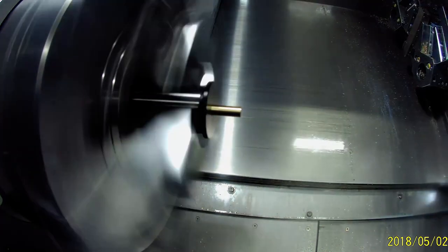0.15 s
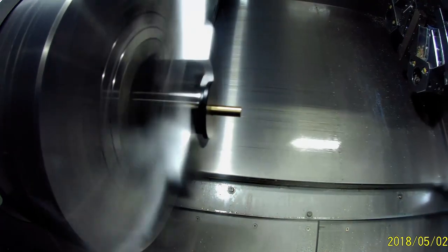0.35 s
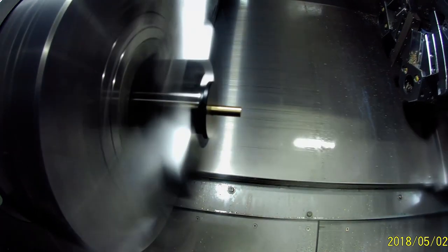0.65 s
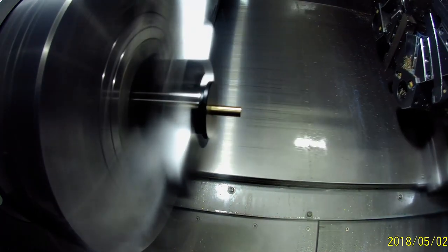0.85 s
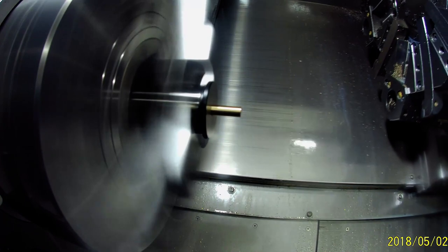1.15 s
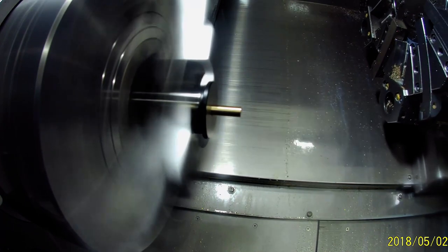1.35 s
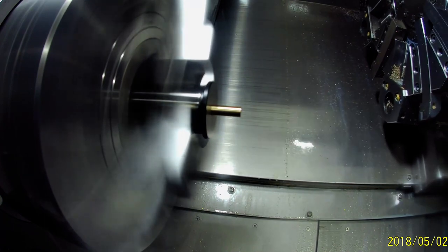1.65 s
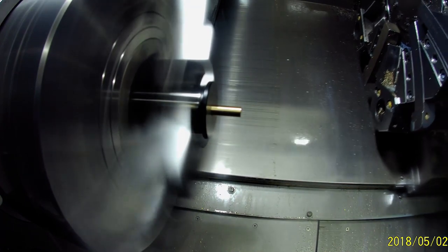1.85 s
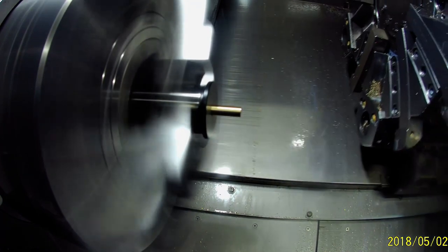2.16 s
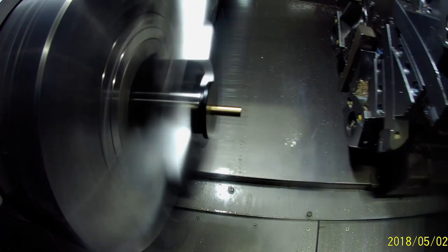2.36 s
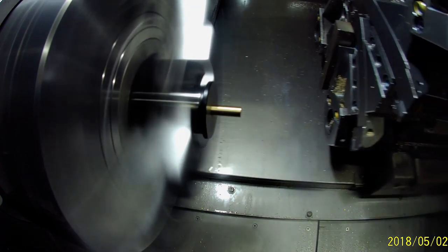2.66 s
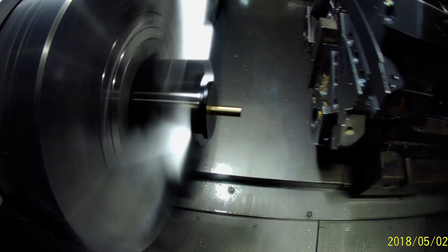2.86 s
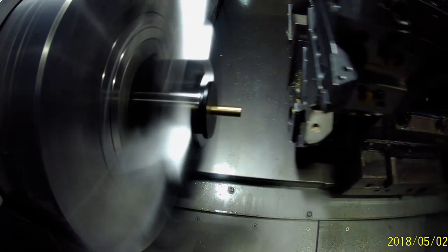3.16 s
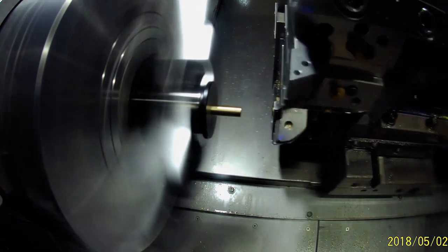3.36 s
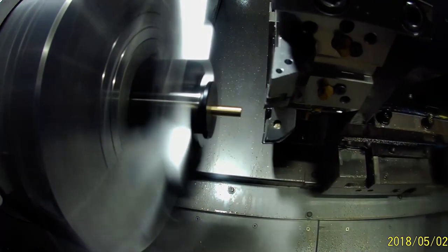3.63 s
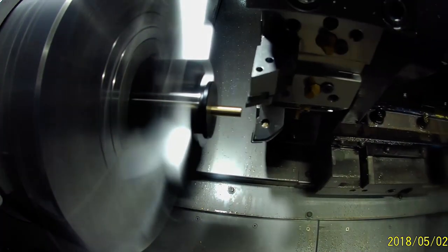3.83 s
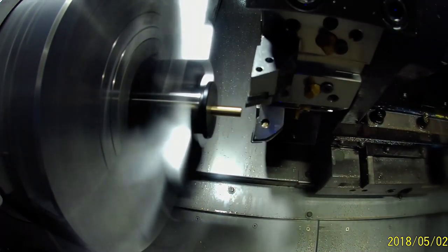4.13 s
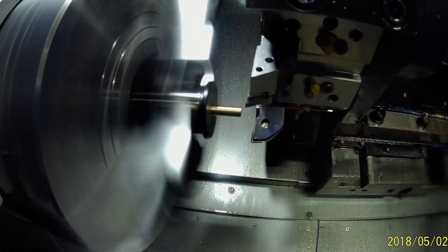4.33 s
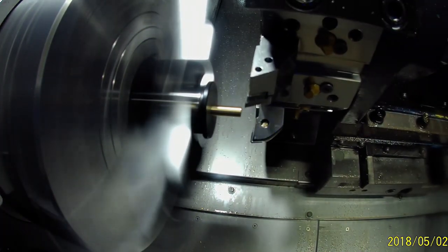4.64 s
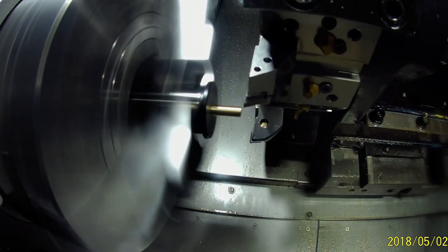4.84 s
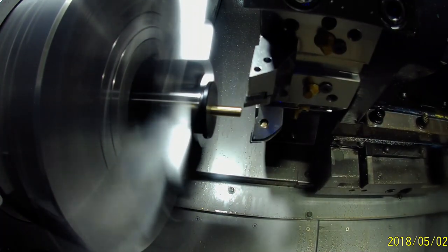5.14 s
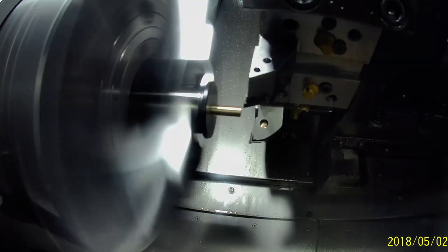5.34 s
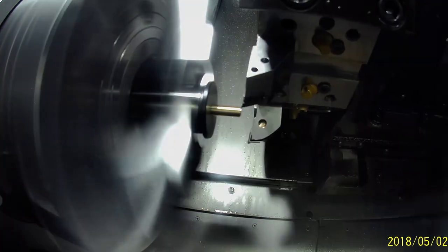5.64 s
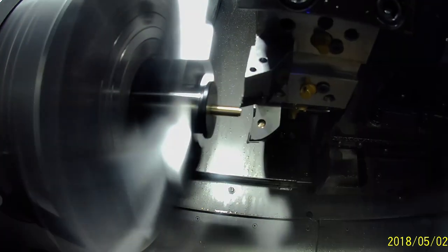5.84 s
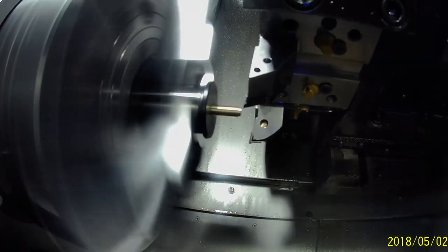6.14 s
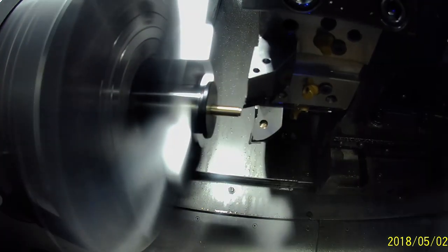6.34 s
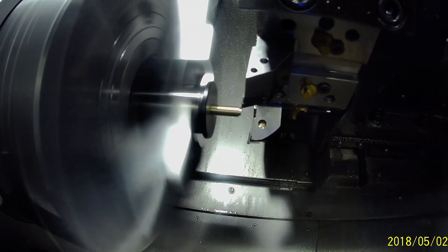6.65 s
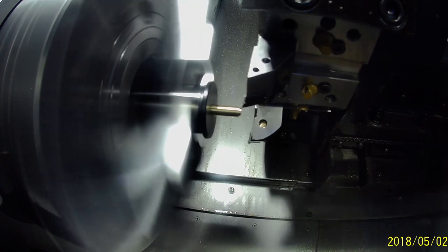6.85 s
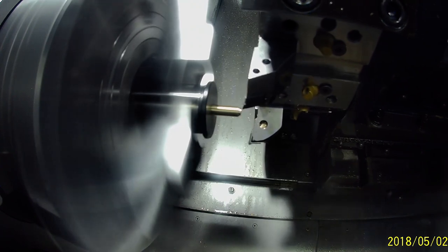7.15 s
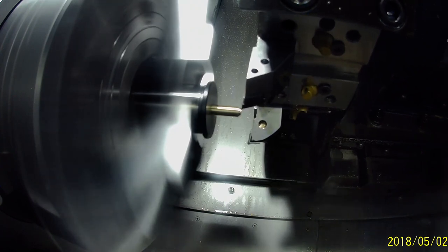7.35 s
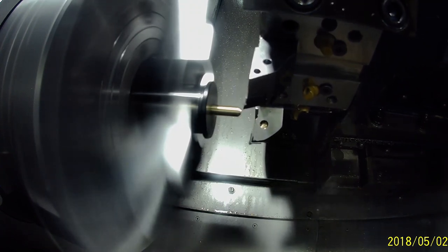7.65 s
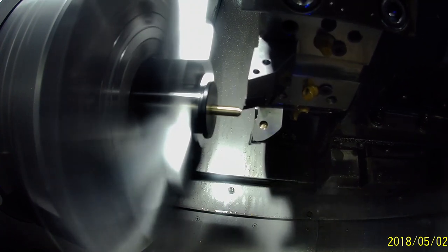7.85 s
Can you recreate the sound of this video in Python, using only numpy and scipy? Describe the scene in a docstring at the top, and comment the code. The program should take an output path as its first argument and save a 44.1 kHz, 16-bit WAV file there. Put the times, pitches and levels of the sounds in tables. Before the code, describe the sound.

A near microphone in a reverberant metal machine catches a quick rising motor whine, settling into a steady low hum with lumpy buffeting and airy hiss. The hum drops away as the tool carrier settles; sheet metal clatters, a gritty surge grows and stops suddenly. Light rattles and small knocks continue, crossed by three short, piercing air jets with brief echoes.

```python
"""CNC lathe run-up and air blasts

A CNC lathe spins up: the motor drive whistles and three chuck jaws beat the air into a 100 Hz hum with a windy rush.
As the tool turret arrives the jaw hum gives way to a faint 100 Hz hum, probably from the mains.
A rough rush swells and stops dead, and the guards rattle and knock.
Three blasts of compressed air, made of shaped noise and gliding tones, hiss and ring out in the workshop."""
import sys
import numpy as np
from scipy import signal
from scipy.fft import rfft, irfft, next_fast_len
from scipy.io import wavfile

SR = 44100
rng = np.random.default_rng(int(sys.argv[2]) if len(sys.argv) > 2 else 0)


def int16_out(signal):
    """Quantize to a 16-bit WAV file."""
    q = np.round(np.clip(np.atleast_2d(signal).T, -1, 1) * 32767)
    wavfile.write(sys.argv[1], SR, q.astype(np.int16))


N = 352403
TIME = np.arange(N) / SR
TOP_HZ = 100.05   # jaw passes per s at full speed
START_S = 0.24   # spindle starts to turn


def from_db(db):
    """Decibels to gain."""
    return 10 ** (np.asarray(db) / 20)


def rms_one(x):
    """Scale to unit power."""
    return x / np.sqrt(np.mean(x ** 2) + 1e-20)


def curve(rows):
    """Gain along rows of (time_s, level_db), held beyond the ends."""
    return from_db(np.interp(TIME, *np.transpose(rows)))


def gains(rows):
    """One gain curve per dB column, fading exponentially outside the rows' times."""
    time_s, *columns_db = np.transpose(rows)
    outside_s = np.maximum(np.maximum(time_s[0] - TIME, TIME - time_s[-1]), 0)
    fade = np.exp(-outside_s / 0.071)
    return [from_db(np.interp(TIME, time_s, level_db)) * fade for level_db in columns_db]


def swell(start_s, stop_s, attack_s, release_s):
    """Envelope that rises smoothly until start, holds at 1 and decays after stop."""
    before = np.maximum(start_s - TIME, 0) / attack_s
    after = np.maximum(TIME - stop_s, 0) / release_s
    return np.exp(-np.minimum(before ** 2 + after, 20))


def drift(rate_hz):
    """Slow random wander with a spread of 1, low-passed noise computed at SR / 40."""
    r = np.exp(-80 * np.pi * rate_hz / SR)
    white = rng.standard_normal(N // 40 + 2002)
    slow = signal.lfilter([1], [1, -2 * r, r * r], white)[2000:]   # drop the settling
    return np.interp(np.arange(N) / 40, np.arange(len(slow)), rms_one(slow))


def coloured(x, spectrum):
    """Shape a sound by (freq_hz, density_db), falling 36 dB/octave beyond the ends; rms 1."""
    hz, density_db = np.transpose(spectrum)
    size = next_fast_len(N + 8192)
    octave = np.log2(np.maximum(np.arange(size // 2 + 1) * SR / size, 1))
    beyond = np.abs(octave - np.clip(octave, np.log2(hz[0]), np.log2(hz[-1])))
    shape = from_db(np.interp(octave, np.log2(hz), density_db) - 36 * beyond)
    return rms_one(irfft(rfft(x, size) * shape, size)[:N])


def noise(spectrum):
    """Turbulent noise of a given colour; rms 1."""
    return coloured(rng.standard_normal(N), spectrum)


def narrow_tone(hz, width_hz, steadiness=0.52):
    """A resonance fed by turbulence: a tone that wavers in level and phase; rms 1."""
    waver = drift(width_hz / 2) + 1j * drift(width_hz / 2)
    waver = waver / (np.abs(waver) + 0.1) ** steadiness
    phase = 2 * np.pi * np.cumsum(hz * np.ones(N)) / SR
    return rms_one(np.real(waver * np.exp(1j * phase)))


def glides(rows, width_hz, edge_s):
    """Narrow resonances that swell, slide from one pitch to another and fade."""
    out = np.zeros(N)
    for start, stop, from_hz, to_hz, level_db in rows:
        hz = np.interp(TIME, [start, stop], [from_hz, to_hz])
        out += from_db(level_db) * swell(start, stop, edge_s, edge_s) * narrow_tone(hz, width_hz)
    return out


def ring(clicks, hz, t60_s):
    """A two-pole resonance: each unit click starts a decaying sine of initial height 1."""
    r, w = from_db(-60 / (t60_s * SR)), 2 * np.pi * hz / SR
    return signal.lfilter([0, np.sin(w)], [1, -2 * r * np.cos(w), r * r], clicks + 1e-18)


def bump(hz, rise_s):
    """A resonance whose envelope swells to 1 in the rise time and dies away."""
    t = TIME[:SR // 4]
    return t / rise_s * np.exp(1 - t / rise_s) * np.sin(2 * np.pi * hz * t)


def contacts(per_s, spread_db):
    """Random small impacts of uneven strength and either sign."""
    sizes = from_db(spread_db * np.minimum(rng.exponential(1, N), 4))
    return sizes * rng.choice([-1, 1], N) * (rng.random(N) < per_s / SR)


def add(out, start_s, sound):
    """Mix a short sound in at a time."""
    at = int(start_s * SR)
    out[at:at + len(sound)] += sound[:N - at]


def jaw_rate():
    """Jaw passes per s: constant torque to base speed, then constant power (rate squared climbs) to the top."""
    base_s, base_hz, power_hz2_per_s = 0.58, 55, 13200
    torque_hz = base_hz * np.clip((TIME - START_S) / (base_s - START_S), 0, 1)
    power_hz2 = power_hz2_per_s * np.maximum(TIME - base_s, 0)
    return np.minimum(np.sqrt(torque_hz ** 2 + power_hz2), TOP_HZ)


def stirred():
    """Share of the air round the chuck that has been set moving."""
    return swell(0.58, TIME[-1], 0.12, 1)


def hum(speed, phase, flutter=0.097, upper_flutter=0.17):
    """Uneven harmonics: jaw hum until about 4.5 s, then a faint 100 Hz hum, probably from the mains."""
    # harmonics of the hum: order, relative_db
    hum_orders = [(1, 1), (2, -10.5), (3, -16.5), (4, -31.5), (5, -39)]
    # level of the jaw hum until about 4.5 s, then of the faint hum: time_s, relative_db
    hum_level = [(4.1, 0), (4.29, -8), (4.41, -8), (4.49, -20.5), (5.25, -20.5), (5.36, -29), (5.87, -29),
                 (5.95, -35.5), (6.13, -35.5), (6.19, -28), (6.72, -31.5), (7.02, -25), (7.2, -28),
                 (7.99, -27)]
    # brief booms with the heavier jolts: time_s, level_db
    booms = [(4.61, -33.5), (4.9, -30), (5.23, -34)]
    top_db, speed_power, waver_db, boom_s = -18, 2.6, 0.33, 0.035
    harmonics = np.zeros(N)
    for k, relative_db in hum_orders:
        uneven = 1 + upper_flutter * np.log(k) * drift(16)
        harmonics += from_db(relative_db) * uneven * np.cos(k * phase)
    level = from_db(top_db) * speed ** speed_power * stirred() * curve(hum_level)
    for s, level_db in booms:
        level = level + from_db(level_db) * swell(s, s, boom_s, boom_s)
    return level * from_db(waver_db * drift(4)) * (1 + flutter * drift(17)) * harmonics


def windage(speed, phase, chop=0.057, lumpy_db=1.8):
    """Eddies off the chuck grow with speed: lumpy buffeting, a rush and hiss chopped by the jaws, and thuds."""
    # airflow strength: time_s, relative_db
    airflow = [(.78, -2), (.97, 2.5), (1.17, 2), (1.6, .5), (3.3, -.2), (3.6, -2.4), (4.0, -2.5),
               (4.38, -7), (4.58, -21)]
    # stronger gusts of buffeting: time_s, level_db
    gust_rows = [(.58, -37.5), (1.18, -27), (1.42, -30), (3.57, -35), (3.69, -28), (3.98, -35.5),
                 (4.38, -39)]
    # low thuds of air: start_s, level_db, pitch_hz
    thuds = [(1.0, -29, 42), (1.176, -17.5, 192.2), (2.74, -27, 55), (3.47, -23, 85.4), (3.697, -23, 75.7),
             (3.97, -29, 50.6)]
    # spectra of the buffeting, rush and hiss: freq_hz, density_db (relative, per Hz)
    buffet_colour = [(15, -13.5), (30, -6), (55, 2), (85, 2.5), (130, -2.5), (200, -6), (300, -13),
                     (450, -36.5)]
    rush_colour = [(190, -36.5), (330, 0.5), (398, -1), (455, -9), (545, -4.5), (772, -9.5), (844, -4.5),
                   (907, -10), (1110, -9), (1330, -14.5), (1770, -6), (2080, -16.5), (2800, -20.5),
                   (3640, -54), (6160, -120)]
    hiss_colour = [(2000, -5), (2700, -3), (3400, 2.5), (4500, -0.5), (6000, -6.5), (6900, -10.5),
                   (7600, -19.5), (9000, -20), (10500, -42.5), (16000, -44)]
    gust_s, hiss_sag_db_per_s = 0.045, 1.5

    flow = curve(airflow) * swell(0, airflow[-1][0], 1, release_s=0.14)
    gusts = sum(from_db(level_db) * swell(s, s, gust_s, gust_s) for s, level_db in gust_rows)
    # the frame shudders under the starting torque
    gusts = gusts + from_db(-52) * swell(0.25, 0.52, 0.022, gust_s)
    buffet = flow * stirred() * from_db(-32.5 + lumpy_db * drift(9.7)) * speed ** 1.8
    rush = from_db(-36 + 1.1 * drift(11)) * speed ** 1.12 * noise(rush_colour)
    hiss_db = -47.5 - hiss_sag_db_per_s * (TIME - 1)
    hiss = from_db(hiss_db) * speed ** 1.18 * noise(hiss_colour)
    out = np.hypot(buffet, gusts) * noise(buffet_colour)
    out += flow * (1 + chop * np.cos(phase)) * (rush + hiss)
    for s, level_db, hz in thuds:
        add(out, s, from_db(level_db) * bump(hz, rise_s=0.94 / hz))
    return out


def motor(phase):
    """The drive's carrier with sidebands that fan out with speed, a thin sizzle and the starting groan."""
    # drive sidebands: offset in jaw rates, relative_db
    sideband_rows = [(-4.5, -10.5), (7.5, -11), (0, -13.5), (2.5, -11.5), (19, -23)]
    # whistle each time the drive pulls: start_s, stop_s, relative_db
    pulls = [(0.25, 0.296, -40.5), (.368, .505, -44.5), (0.615, 0.664, -42), (.71, 0.748, -42),
             (0.88, .93, -42), (1.103, 1.15, -52.5)]
    # thin sizzle, strongest in the run-up, fading out by 3.4 s: time_s, relative_db
    sizzle_rows = [(0.3, -94), (0.36, -72), (0.48, -62.5), (0.69, -58), (0.84, -72.5), (1.11, -64),
                   (3.36, -88), (3.4, -106)]
    # spectra of the sizzle and groan: freq_hz, density_db (relative, per Hz)
    sizzle_colour = [(6500, -8), (8500, -5), (10300, -8.5), (13000, -2), (14800, -2.5), (16000, -16.5)]
    groan_colour = [(700, -11), (1100, -0.5), (1300, 8.5), (1550, 6.5), (2000, -2.5), (2600, -10),
                    (3300, -23.5), (4500, -32)]
    carrier_hz, attack_s, release_s = 6001, 0.014, 0.026

    carrier = 2 * np.pi * carrier_hz * TIME
    sidebands = np.zeros(N)
    for k, relative_db in sideband_rows:
        level = from_db(relative_db + 1.8 * drift(25))
        sidebands += level * np.sin(carrier + k * phase + drift(25))
    whistle = from_db(0.8 + 1.8 * drift(22)) * np.sin(carrier) + from_db(0.5) * sidebands
    whistle += from_db(-9) * noise([(5300, -17.5), (6050, 9), (6500, -6), (7000, -30)])
    effort = sum(from_db(db) * swell(start, stop, attack_s, release_s) for start, stop, db in pulls)
    # weaker whistle from the start until after top speed is reached
    effort = effort + from_db(-57.5) * swell(START_S, 2.9, attack_s, release_s=0.65)
    sizzle = from_db(2.5) * gains(sizzle_rows)[0] * noise(sizzle_colour)
    # groan as the spindle breaks loose
    groan = from_db(-42) * swell(0.3, 0.3, 0.048, 0.096) * noise(groan_colour)
    return effort * whistle + sizzle + groan


def transmission(rate, phase):
    """A gear whine, roughened once a turn (every third jaw), sweeps through the housing's resonance."""
    # lower housing tone: start_s, stop_s, from_hz, to_hz, level_db
    housing_tone = [(.51, 0.605, 590, 590, -42.5)]
    order, whine_db, housing_hz, housing_q = 15.5, -33, 820, 9
    roughness = 1 + 0.46 * drift(45) + 0.35 * np.cos(phase / 3)
    whine = roughness * np.sin(order * phase + 0.7 * drift(35))
    tuning = order * rate / housing_hz
    housing = tuning / np.hypot(tuning, housing_q * (1 - tuning ** 2))
    running = swell(0.49, 1.0, attack_s=0.05, release_s=1.9)
    tone = glides(housing_tone, width_hz=46, edge_s=0.038)
    return from_db(whine_db) * housing * running * whine + tone


def rattle():
    """Small contacts ring the sheet-metal guards in fits, and a panel sings along."""
    # fits of rattling: start_s, stop_s, rattle_relative_db, panel_relative_db
    shakes = [(4.49, 4.604, -58, -52), (4.62, 4.685, -43.5, -63), (4.768, 4.912, -28, -48),
              (5.159, 5.25, -35, -40), (5.326, 5.403, -62, -49.5), (5.435, 5.465, -45, -47.5),
              (5.557, 5.662, -44.5, -58), (5.711, 5.727, -39, -45.5), (5.753, 5.865, -50, -53),
              (6.244, 6.326, -48, -58.5), (6.412, 6.555, -58.5, -64), (6.7, 6.714, -52, -61),
              (6.79, 6.872, -45, -59.5), (6.895, 6.973, -37, -57.5), (6.996, 7.096, -51.5, -59.5),
              (7.216, 7.38, -57, -56.5), (7.421, 7.697, -46, -53), (7.772, 7.792, -41.5, -52.5),
              (7.83, 7.97, -48, -57.5)]
    # spectra of the rattle and panel: freq_hz, density_db (relative, per Hz)
    rattle_colour = [(150, -35), (280, 0.5), (450, 0.5), (650, -2), (1000, -3), (1400, -2.5), (2200, -28)]
    panel_colour = [(900, -31), (1350, -8.5), (1650, 8), (1900, 4.5), (2200, -10), (3000, -28)]
    shake, panel = np.zeros(N), np.zeros(N)
    for start, stop, shake_db, panel_db in shakes:
        fit = swell(start, stop, attack_s=0.014, release_s=0.038)
        shake += from_db(shake_db) * fit
        panel += from_db(panel_db) * fit
    clicks = contacts(per_s=600, spread_db=1.5)
    dealt = rng.integers(0, 20, N)   # each contact rings one of 20 modes
    rings = np.zeros(N)
    for k, hz in enumerate(np.geomspace(270, 1500, 20)):
        rings += ring(clicks * (dealt == k), hz, t60_s=18 / hz)
    singing = panel * noise(panel_colour) * from_db(2 * drift(25))
    return from_db(-6) * shake * coloured(rings, rattle_colour) + from_db(-3) * singing


def surge():
    """A rough rush of dense impacts and noise sets in, holds, swells steadily in dB and stops dead."""
    # rush spectrum: freq_hz, density_db (relative, per Hz)
    surge_colour = [(30, -4), (60, 0), (130, -6), (240, -11.5), (570, -2), (790, -4.5), (1010, -1.5),
                    (1330, -10), (1690, -6.5), (3120, -17.5), (6300, -26), (7630, -41), (10000, -49),
                    (15000, -49)]
    start_s, swell_s, stop_s, edge_s = 4.708, 5.009, 5.312, 0.0079
    level_db, swell_db_per_s = -40, 47
    grit = rms_one(contacts(per_s=2200, spread_db=2.5)) + 0.73 * rng.standard_normal(N)
    on = np.clip(np.minimum(TIME - start_s, stop_s - TIME) / edge_s, 0, 1)
    swelling_s = np.clip(TIME, swell_s, stop_s) - swell_s
    return on * from_db(level_db + swell_db_per_s * swelling_s) * coloured(grit, surge_colour)


def knocks(crack_db=-5, crack_s=0.0013, spot_rise_s=0.0021):
    """Each knock rings the struck spot and the common modes of the guards, with a brief dull crack."""
    # knocks on the guards: time_s (2.08 ms ahead of the sound), relative_db, pitch_hz
    knock_rows = [(3.334, -23, 293), (4.609, -25.5, 510), (4.764, -28, 475), (4.816, -22.5, 836),
                  (4.837, -29, 820), (4.914, -21.5, 308), (5.145, -20.5, 567), (5.234, -15, 595),
                  (5.422, -40.5, 493), (5.586, -37.5, 434), (5.633, -36.5, 666), (5.707, -32.5, 410),
                  (6.783, -36, 473), (6.91, -32.5, 370), (6.953, -29, 503.9), (7.298, -38.5, 1130),
                  (7.648, -39, 472), (7.762, -31.5, 550)]
    # common guard modes: freq_hz, relative_db, t60_s
    guard_modes = [(327, -19.5, 0.035), (449, -5, 0.05), (590, -7, 0.019), (793, -10, 0.014),
                   (1130, -9, 0.013), (1730, -19, 0.018)]
    out, t = np.zeros(N), TIME[:SR // 4]
    impulse = 1.0 * (t == 0)
    dull = np.vstack([signal.butter(1, 1800, fs=SR, output="sos"),
                      signal.butter(8, 5800, fs=SR, output="sos")])
    for s, level_db, hz in knock_rows:
        body = sum(from_db(mode_db + rng.normal(0, 3.1)) * ring(impulse, mode_hz, t60_s)
                   for mode_hz, mode_db, t60_s in guard_modes)
        crack = signal.sosfilt(dull, rng.standard_normal(len(t)) * np.exp(-t / crack_s))
        spot = bump(hz, spot_rise_s)
        knock = from_db(-1) * spot + from_db(-3.5) * body + from_db(crack_db) * crack
        add(out, s + 0.00208, from_db(level_db) * knock)
    return out


def moans():
    """Rubbing metal inside the rattle sounds as narrow gliding resonances."""
    # moans: start_s, stop_s, from_hz, to_hz, level_db
    moan_rows = [(4.78, 4.795, 421.6, 415, -38), (4.99, 5.07, 1130, 1122, -42),
                 (5.146, 5.15, 1030, 1010, -30), (5.045, 5.08, 700, 613, -40),
                 (5.135, 5.22, 519, 590, -37.5), (7.395, 7.41, 600, 598, -45.5),
                 (7.767, 7.775, 563, 558, -42)]
    return glides(moan_rows, width_hz=84, edge_s=0.016)


def air_blasts(opening_s=0.026, closing_s=0.036):
    """Each jet hisses low first, brightens within 26 ms, and sounds cavities in the metal."""
    # air blasts: open_start_s, bright_start_s, close_start_s, relative_db
    blasts = [(5.727, 5.748, 5.99, -29.5), (6.645, 6.656, 6.81, -30.5), (7.431, 7.457, 7.533, -31.5)]
    # one spectrum per blast, as each strikes the metal differently: freq_hz, density_db (relative, per Hz)
    blast_colours = [
        [(1530, -73), (2600, -34), (3100, -8), (3390, -7), (3920, -2), (4440, 0), (4740, -5.5), (5220, -10),
         (5820, -13.5), (8470, -12.5), (10000, -30.5), (12800, -11.5), (15000, -23)],
        [(1530, -63), (2600, -31), (3150, -4), (3860, 3), (4410, -11), (5070, -14.5), (5870, -11), (6360, -5.5),
         (7200, -7), (7870, -15), (9520, -25.5), (12600, -15.5), (15000, -19)],
        [(1410, -54), (2400, -14), (2950, -1.5), (3390, -2.5), (3920, -5), (4750, -12), (5250, -3),
         (6650, -8.5), (7520, -8.5), (9540, -26), (12800, -15), (15000, -20)],
    ]
    # cavity tones gliding as the jet sweeps: start_s, stop_s, from_hz, to_hz, relative_db
    jet_tones = [(5.75, 5.8, 3640, 4280, -31), (5.86, 6.02, 4600, 4500, -37), (6.665, 6.7, 3150, 3330, -33),
                 (6.75, 6.835, 3690, 3870, -38), (6.68, 6.69, 6220, 6300, -33),
                 (6.73, 6.835, 7160, 7350, -38.5), (7.447, 7.455, 3240, 3250, -33),
                 (7.485, 7.53, 5401, 5540, -34.5)]
    # jet spectrum as the hall returns it: freq_hz, density_db (relative, per Hz)
    hall_colour = [(2200, -25), (3000, 0), (4200, 4), (6300, -3), (7600, -14), (10000, -14), (14000, -18)]
    jets, flow = np.zeros(N), np.zeros(N)
    low_pass = signal.butter(4, 7500, fs=SR, output="sos")
    for (start, bright_start, close_start, level_db), colour in zip(blasts, blast_colours):
        jet = noise(colour)
        low = signal.sosfiltfilt(low_pass, jet)
        opening = np.clip((TIME - start) / opening_s, 0, 1)
        closing = np.clip(1 + (close_start - TIME) / closing_s, 0, 1)
        valve = from_db(level_db) * opening * closing
        bright = np.clip((TIME - bright_start) / 0.004, 0, 1)
        jets += valve * (low + from_db(2.5) * bright * (jet - low))
        flow += valve
    jets = jets * from_db(drift(40))
    tones = glides(jet_tones, width_hz=260, edge_s=0.012)
    machine = reverberate(jets + from_db(-8.5) * tones, t60_s=0.4, treble_damping=2)
    hall = reverberate(flow * noise(hall_colour), t60_s=0.77, treble_damping=1.14)
    near = from_db(-5) * jets + from_db(-1) * tones + from_db(-5.5) * machine
    return near + from_db(-3.5) * fine_grain(near) + from_db(-12.5) * hall


def fine_grain(x):
    """Narrow lines, picked out by peak filters, that add fine grain to the blasts' hiss."""
    # narrow lines in the hiss: freq_hz, relative_db
    fine_lines = [(3160, 3), (3962, 0), (4038, 1), (4364, 4), (4596, 6), (4662, 4), (5474, 7), (6320, 5),
                  (6939, 4), (7121, 4)]
    width_hz = 20
    return sum(from_db(relative_db) * signal.lfilter(*signal.iirpeak(hz, hz / width_hz, fs=SR), x)
               for hz, relative_db in fine_lines)


def reverberate(x, t60_s, treble_damping):
    """Dense reflections as decaying noise; above 8 kHz they die faster by the damping factor."""
    t, response = TIME[:SR], 0
    for kind, damping in [("low", 1), ("high", treble_damping)]:
        band = signal.butter(4, 8000, kind, fs=SR, output="sos")
        echoes = signal.sosfilt(band, rng.standard_normal(SR))
        response = response + echoes * from_db(-60 * t * damping / t60_s)
    return signal.fftconvolve(x, response / np.sqrt(np.sum(response ** 2)))[:N]


def drones():
    """Pump and bearings sing at fixed pitches, as narrow wavering tones."""
    # drones: start_s, stop_s, pitch_hz, width_hz, level_db
    drone_rows = [(0.1, 0.3, 388, 30, -68), (0.1, .25, 775, 45, -63), (0.02, 4.6, 842, 37, -66),
                  (0.93, 4.1, 845, 40, -53), (0.58, 3.6, 3467, 260, -61)]
    return sum(gains([(start, level_db), (stop, level_db)])[0] * narrow_tone(hz, width_hz)
               for start, stop, hz, width_hz, level_db in drone_rows)


def workshop():
    """Far machinery: noise split at 1500 Hz into a rumble and a hiss, each with its own level."""
    # background gains: time_s, rumble_gain_db, hiss_gain_db
    shop = [(0, -59, -57.5), (.25, -60, -72), (4.5, -61.5, -60), (5.5, -54.5, -57), (6.05, -59, -55.5),
            (6.5, -61, -60.5), (7.3, -54.5, -57), (8, -53.5, -48.5)]
    # background spectrum: freq_hz, density_db (relative, per Hz)
    shop_colour = [(25, 1), (70, 7), (150, 0), (300, -2.5), (600, -5.5), (850, -6), (1200, -7.5),
                   (2400, -17.5), (4500, -17.5), (6400, -21.5), (7600, -39.5), (15000, -39)]
    rumble, hiss = gains(shop)
    room = noise(shop_colour)
    low = signal.sosfiltfilt(signal.butter(4, 1500, fs=SR, output="sos"), room)
    return rumble * low + hiss * (room - low)


def scene():
    """One phase, from the jaw rate, drives hum, whine and sidebands; speed sets the strength of the wind."""
    rate = jaw_rate()
    speed, phase = rate / TOP_HZ, 2 * np.pi * np.cumsum(rate) / SR
    spindle = windage(speed, phase) + motor(phase) + transmission(rate, phase)
    guards = rattle() + surge() + knocks() + moans()
    background = drones() + workshop()
    return (hum(speed, phase) + spindle + guards + air_blasts() + background)[None]


def record(dry):
    """A steep elliptic low-pass cuts the top at 15.2 kHz."""
    return signal.sosfilt(signal.ellip(10, 0.2, 80, 15200, fs=SR, output="sos"), dry)


dry = scene()
out = record(dry)
int16_out(out)
```